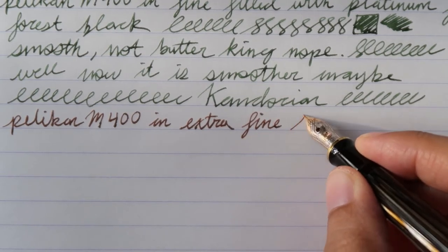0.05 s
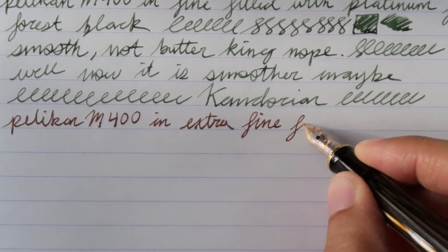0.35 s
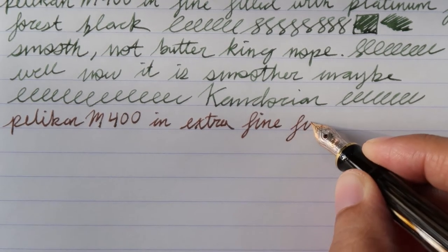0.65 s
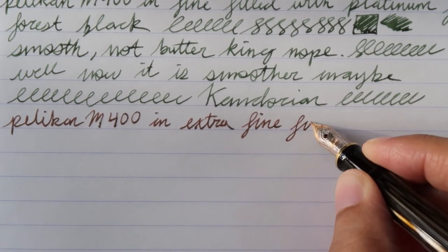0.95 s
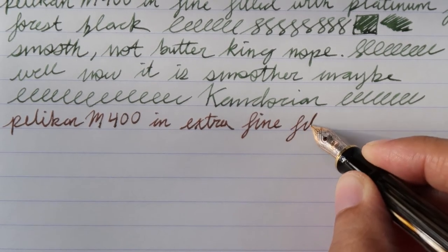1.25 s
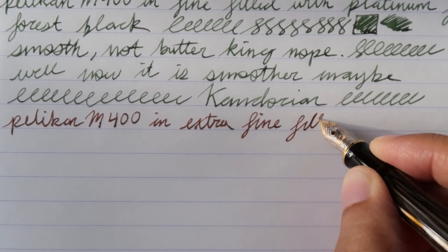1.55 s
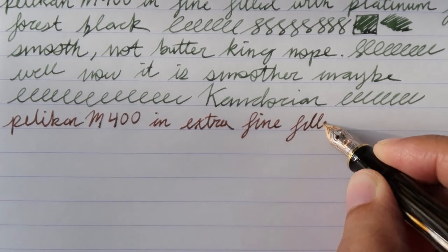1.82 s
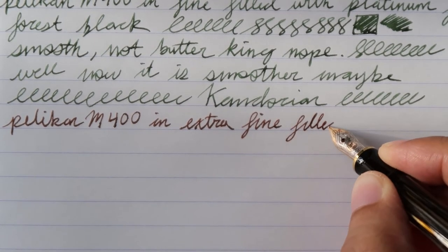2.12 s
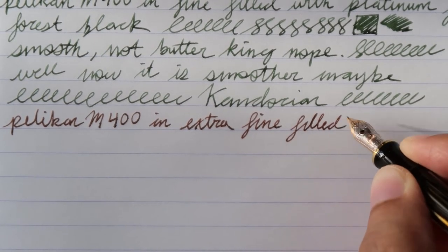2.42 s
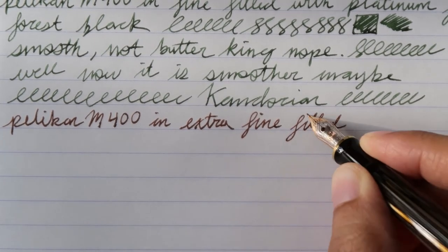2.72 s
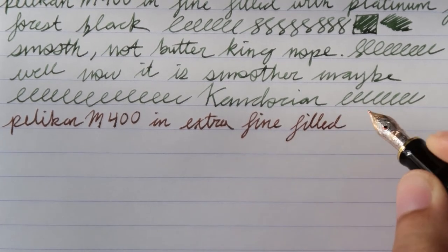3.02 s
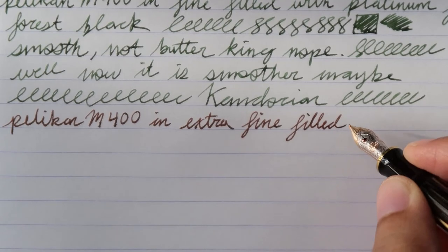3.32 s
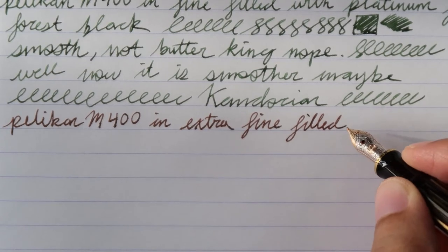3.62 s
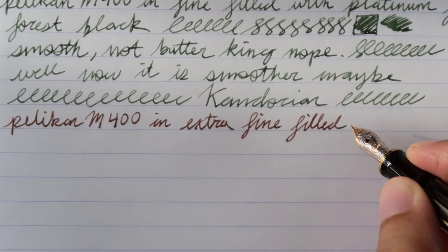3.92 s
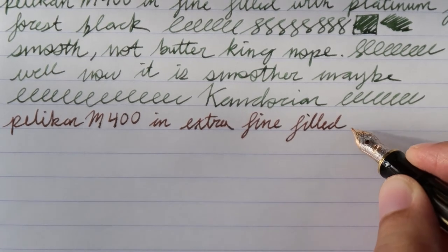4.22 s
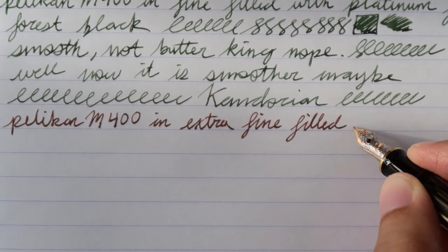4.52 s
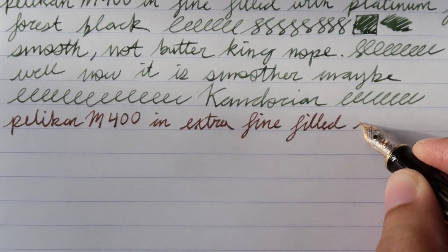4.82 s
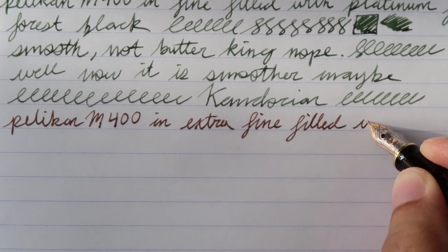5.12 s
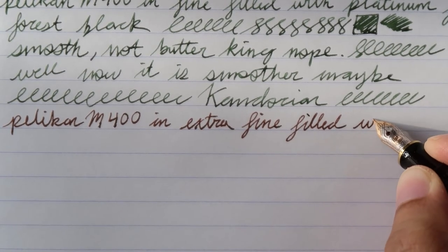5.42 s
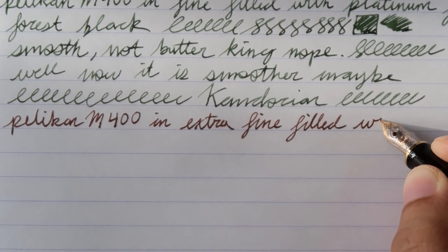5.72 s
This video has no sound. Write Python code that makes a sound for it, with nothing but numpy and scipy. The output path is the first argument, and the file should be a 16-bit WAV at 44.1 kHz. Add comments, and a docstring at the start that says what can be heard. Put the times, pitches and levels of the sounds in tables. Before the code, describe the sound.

A fountain pen scratches lightly on paper in short strokes, pausing briefly as a hand shifts on the sheet, in a quiet room.

```python
"""A fountain pen taps down on a paper pad and starts to write, close to the microphone, in a quiet room.
The nib drags over the fibres: the pen body murmurs near 1 kHz and the tines hiss above it.
Between two words the nib taps a dot, and the hand slides over the sheet and makes it crackle.
Behind the pen, the room hums and rumbles throughout."""
import sys
import numpy as np
from scipy import signal
from scipy.fft import rfft, irfft, next_fast_len
from scipy.io import wavfile
from scipy.ndimage import uniform_filter1d, map_coordinates

SR = 44100
rng = np.random.default_rng(int(sys.argv[2]) if len(sys.argv) > 2 else 0)


def inscribe(sig):
    """Save sig as 16-bit PCM at rate SR to the path in sys.argv[1].

    A 1-D sig is mono; a 2-D sig holds one channel per row.
    Samples are clipped to [-1, 1] before scaling.
    """
    pcm = np.round(np.clip(np.atleast_2d(sig).T, -1, 1) * 32767)
    wavfile.write(sys.argv[1], SR, pcm.astype(np.int16))


N = 258140
TIME = np.arange(N) / SR
# the loudness of each kind of friction goes as speed to these powers
RUB_POWER, GLIDE_POWER, DRAG_POWER, SCRATCH_POWER = 0.74, 0.3, 1.25, 1.57
STROKE_PEAK = 0.48  # the nib is fastest at this share of a stroke


def amp(db):
    return 10 ** (np.asarray(db) / 20)


def unit(x):
    return x / np.sqrt(np.mean(x ** 2) + 1e-30)


def filtered(x, response):
    """x times a response of frequency."""
    size = next_fast_len(N + SR // 2)
    return irfft(rfft(x, size) * response(np.fft.rfftfreq(size, 1 / SR)), size)[:N]


def coloured(x, points):
    """x through a spectrum of (frequency [Hz], gain [dB]) points on a log axis, at unit rms."""
    freqs, db = np.transpose(points)
    return unit(filtered(x, lambda hz: amp(np.interp(np.log(hz + 1), np.log(freqs), db))))


def resonant(x, modes, skirt):
    """x through (frequency [Hz], width [Hz], gain [dB]) modes; a larger skirt darkens the valleys."""
    def response(hz):
        power = 0
        for centre, width, db in modes:
            detuning = (hz ** 2 - centre ** 2) / (hz * width + 1e-9)
            power += amp(db) ** 2 * (1 + detuning ** 2 / skirt) ** -skirt
        return np.sqrt(power)
    return filtered(x, response)


def ringing_noise(modes, skirt):
    """White noise through resonances, at unit rms."""
    return unit(resonant(rng.standard_normal(N), modes, skirt))


def band(hz, width, skirt=1.77):
    """One wavering band of noise."""
    return ringing_noise([(hz, width, 0)], skirt)


def wobble(rate):
    """A smooth random curve, rate knots a second."""
    return map_coordinates(rng.standard_normal(int(N * rate / SR) + 4), [TIME * rate])


def friction(slip_rate, smooth, patchy_db=0, patch_rate=91):
    """Tiny slips, slip_rate a second, over smooth sliding; the paper's grain can come in patches."""
    slips = (rng.random(N) < slip_rate / SR) * rng.standard_normal(N)
    return (unit(slips) + smooth * rng.standard_normal(N)) * amp(patchy_db * wobble(patch_rate))


def drifting(x, patchy_db):
    """The colour drifts in patches as the contact point moves."""
    spectra = signal.stft(x, nperseg=512)[2]
    patches = uniform_filter1d(rng.standard_normal(spectra.shape), size=6, axis=0)
    patches = uniform_filter1d(patches, size=12, axis=1)
    return signal.istft(spectra * amp(patchy_db * unit(patches)), nperseg=512)[1][:N]


def burst(start, db, attack, t60):
    """An envelope that jumps up and dies away."""
    age = np.maximum(TIME - start, 0)
    return amp(db - 60 * age / t60) * (1 - np.exp(-age / attack))


def sweep(start, length, peak, power):
    """The loudness of one movement: it speeds up from rest, peaks at a share of its length and stops."""
    progress = (TIME - start) / length
    moving = (progress > 0) & (progress < 1)
    lean = np.log(0.5) / np.log(peak)
    out = np.zeros(N)
    out[moving] = np.sin(np.pi * progress[moving] ** lean) ** power
    return out


# the hiss of the room behind the pad: (frequency [Hz], gain [dB])
HISS_SPECTRUM = [(140, -20), (240, -3), (350, -2), (450, -8), (800, -12), (950, -17), (1400, -22),
                 (2000, -25), (4000, -28), (7500, -29), (12500, -37), (16000, -39)]
# mains hum in the room: (frequency [Hz], level [dB])
MAINS_HUM = [(120, -69), (240, -86.5)]
# the drone of the room: (frequency [Hz], width [Hz], level [dB])
DRONE_BANDS = [(116.2, 14, -73), (161.3, 13, -71.5), (188, 5.7, -72.5), (246.8, 6.4, -87.5),
               (275.8, 15, -82), (352, 23, -78), (682.5, 20, -85.5)]
def room_tone():
    """The steady background at the microphone: hiss, mains hum and a drone of narrow, wavering bands."""
    hiss = amp(-74) * coloured(rng.standard_normal(N), HISS_SPECTRUM)
    hum = sum(amp(db) * unit(np.sin(2 * np.pi * hz * TIME + 0.25 * wobble(3))) for hz, db in MAINS_HUM)
    drone = sum(amp(db) * band(hz, width) for hz, width, db in DRONE_BANDS)
    return hiss + hum + drone


# the low end of the room: (frequency [Hz], gain [dB])
RUMBLE_SPECTRUM = [(1, 6.5), (5, 9), (10, 4), (15, 5), (20, -9.5), (37, -5), (48, -16), (58, -16),
                   (76, -26.5), (140, -27), (230, -37.5), (300, -68.5)]
# swells of the rumble: (time [s], length [s], level [dB])
RUMBLE_SWELLS = [(1.422, 0.13, -52), (1.572, 0.22, -49)]
# the fade of the room's boom: (time [s], relative level [dB])
BOOM_FADE = [(0.0, -57.5), (0.5, -57), (1.4, -67), (5.85, -67.5)]
def room_rumble():
    """A deep rumble swells twice; a low boom above it fades early on."""
    rumble = amp(-46.5) * coloured(rng.standard_normal(N), RUMBLE_SPECTRUM)
    swells = sum(amp(db) * sweep(start, length, 0.51, 0.83) for start, length, db in RUMBLE_SWELLS)
    boom = amp(np.interp(TIME, *np.transpose(BOOM_FADE)) - 6.5)
    return rumble + swells * band(hz=28.8, width=11.4) + boom * band(hz=171, width=25)


# skin on paper, heard close: (frequency [Hz], gain [dB])
SKIN_SPECTRUM = [(120, -32), (240, -8), (420, -4), (630, -1.5), (1200, -4), (2700, -12), (5500, -16.5),
                 (12000, -21), (16000, -27)]
# four pushes across the sheet: (time [s], length [s], peak [share of length], relative level [dB])
HAND_SLIDES = [(2.787, 0.44, 0.38, -78.5), (3.337, 0.32, 0.5, -75), (3.536, 0.33, 0.5, -79.5),
               (3.737, 0.34, 0.46, -76)]
def hand_rub():
    """Between the words the side of the hand slides over the sheet, then rests and stirs faintly."""
    rub = coloured(friction(slip_rate=1800, smooth=1.4, patchy_db=1.6, patch_rate=54), SKIN_SPECTRUM)
    resting = amp(-81.5) * sweep(start=3.217, length=1.54, peak=0.26, power=RUB_POWER)
    power = resting ** 2
    for start, length, peak, db in HAND_SLIDES:
        power += (amp(db) * sweep(start, length, peak, RUB_POWER)) ** 2
    return amp(3.5) * np.sqrt(power) * rub


# shifts of the pad: (time [s], length [s], level [dB], pitch [Hz])
PAD_SHUFFLES = [(2.884, 0.17, -67, 246), (2.89, 0.2, -78.5, 775), (3.05, 0.037, -70, 597),
                (3.6, 0.2, -77, 447), (3.8, 0.045, -69.5, 730), (3.817, 0.22, -71, 420),
                (3.915, 0.071, -71, 647)]
def pad_shuffles():
    """The pad shifts under the hand with a dull shuffle."""
    return sum(amp(db) * sweep(start, length, 0.37, RUB_POWER) * band(hz, width=0.3 * hz, skirt=0.93)
               for start, length, db, hz in PAD_SHUFFLES)


# the sheet gives under the hand: (time [s], relative pop level [dB], pitch [Hz], crackle level [dB])
SHEET_CREASES = [(2.88, -61, 1500, -63), (3.053, -72, 900, -63), (3.139, -60, 1590, -67),
                 (3.680, -55, 1010, -57), (3.711, -63, 860, -52.5), (3.751, -70, 2180, -65),
                 (3.8111, -45.5, 1230, -56), (3.979, -62, 2370, -57)]
# crackling paper, heard close: (frequency [Hz], gain [dB])
CRACKLE_SPECTRUM = [(150, -1), (400, 13), (1300, -3), (2200, -7), (5000, -11.5), (7000, -15), (15000, -26)]
def creases():
    """The sheet buckles with a dull pop of a few cycles and a brief crackle."""
    crackle = coloured(rng.standard_normal(N), CRACKLE_SPECTRUM)
    out = np.zeros(N)
    for start, pop_db, hz, crackle_db in SHEET_CREASES:
        tone = np.sin(2 * np.pi * hz * (TIME - start))
        out += burst(start, pop_db + 1, attack=0.00026, t60=0.0049) * tone
        out += burst(start, crackle_db, attack=0.00091, t60=0.024) * crackle
    return out


# fibres that catch the nib: (time [s], relative level [dB], pitch [Hz])
FIBRE_SNAGS = [(0.775, -70, 7500), (3.201, -65, 7900), (3.998, -63, 6700), (5.184, -66.5, 4540),
               (5.387, -60, 2720)]
def snags():
    """A fibre lets go of the nib with one short, pitched tick."""
    return sum(burst(start, db - 10.5, attack=0.00055, t60=0.044) * band(hz, width=0.2 * hz, skirt=1.4)
               for start, db, hz in FIBRE_SNAGS)


# the nib barely touching the page: (frequency [Hz], gain [dB])
FLICK_SPECTRUM = [(1000, 7.5), (2500, 1), (5500, 0), (11500, 1.5), (13500, -8), (16000, -22)]
def flick():
    """One light, airy upstroke: with almost no pressure the nib only whispers."""
    level = amp(-75) * sweep(start=2.522, length=0.09, peak=STROKE_PEAK, power=SCRATCH_POWER)
    return level * coloured(rng.standard_normal(N), FLICK_SPECTRUM)


# the thud of the pad: (frequency [Hz], width [Hz], gain [dB])
THUD_MODES = [(376, 140, -2), (500, 79, 5)]
def dig():
    """On its hardest stroke the nib digs in and gives the pad a soft, low knock."""
    level = amp(-66.5) * sweep(start=2.364, length=0.06, peak=0.45, power=DRAG_POWER)
    return level * ringing_noise(THUD_MODES, skirt=1.2)


# the nib lands, close to the microphone: (time [s], relative knock level [dB], skid level [dB])
NIB_TAPS = [(0.053, -64, -83), (2.7525, -60.5, -69), (2.757, -70, -63.5), (2.763, -59, -69),
            (2.802, -59, -72), (2.806, -67, -71), (5.212, -59, -76)]
# what a landing rings in the pen: (frequency [Hz], gain [dB], t60 [s])
KNOCK_MODES = [(1023, -0.5, 0.06), (1123, -1.5, 0.025), (1380, 0.5, 0.017), (1760, -9, 0.018),
               (2140, -22, .03), (2650, -9, 0.017), (4230, -13, 0.03)]
def taps():
    """The landing nib knocks the pen body and skids for a moment."""
    skid = ringing_noise([(1160, 400, 7), (2560, 620, 0), (3900, 500, -9)], skirt=2.1)
    out = skid * sum(burst(start, db, attack=0.002, t60=0.06) for start, _, db in NIB_TAPS)
    age = np.arange(SR // 10) / SR
    onset = 1 - np.exp(-age / 0.0008)
    for start, knock_db, _ in NIB_TAPS:
        ring = 0
        for hz, db, t60 in KNOCK_MODES:
            decay = amp(db + rng.normal(0, 1.2) - 60 * age / t60)
            ring += decay * np.sin(2 * np.pi * (hz * age + rng.random()))
        out[round(start * SR):][:len(age)] += amp(knock_db - 4) * ring * onset
    return out


# resonances of the tines, heard close: (frequency [Hz], width [Hz], gain [dB])
TINE_MODES = [(2490, 1150, -1), (2980, 360, -0.5), (3730, 420, -2), (4175, 340, 1.3), (5000, 480, -4),
              (5370, 400, 2.5), (6810, 700, -6.5), (8230, 800, -3.5), (9160, 490, -4.2),
              (11100, 2600, -16.5), (14700, 1000, -17)]
# soft modes of the pad under the nib: (frequency [Hz], width [Hz], gain [dB])
PAD_MODES = [(263, 34, -14), (404, 150, 1.5), (470, 130, -2)]
TREBLE_HZ = 5830  # above this the hiss follows the treble level
def scratch(level, treble_level):
    """The edges of the tines catch many fine fibres and hiss; the pad thrums under them."""
    ring = resonant(friction(slip_rate=7000, smooth=1.6), TINE_MODES, skirt=1.7)
    clock = np.arange(N) + np.cumsum(0.013 * wobble(rate=14))  # the resonances shift as the nib turns
    wandering = map_coordinates(ring, [clock], mode="mirror")
    hiss = unit(drifting(wandering, patchy_db=2.3))
    treble = filtered(hiss, lambda hz: 1 - 1 / (1 + (hz / TREBLE_HZ) ** 6))
    thrum = amp(1.5) * ringing_noise(PAD_MODES, skirt=1.7)
    return level * (hiss - treble + thrum) + treble_level * treble


# resonances of the pen on the pad, heard close: (frequency [Hz], width [Hz], gain [dB])
PEN_MODES = [(480, 260, -8), (979, 57, 1), (1037, 63, -4), (1106.7, 16, 6.5), (1177, 33, 1), (1287, 34, 2),
             (1407, 137, 2), (1620, 170, -7.5), (1686, 55, -10.5), (1730, 130, -5.5)]
def drag(level, favoured_hz):
    """Rough spurts of drag ring the pen; the stroke's direction favours the modes near one pitch."""
    slips = friction(slip_rate=1800, smooth=1.3, patchy_db=0.5, patch_rate=68)
    ring, power = np.zeros(N), np.zeros(N)
    for hz, width, db in PEN_MODES:
        weight = 0.22 + 1 / (1 + ((hz - favoured_hz) / 115) ** 2)
        mode = resonant(slips, [(hz, width, db)], skirt=1.53)
        ring += weight * mode
        power += weight ** 2 * np.mean(mode ** 2)
    return level * unit(ring / np.sqrt(power))


# the nib stays on the page through joined letters: (time [s], length [s], level [dB])
NIB_GLIDES = [(0.053, 0.74, -82), (1.144, 1.6, -83.5), (4.83, 0.63, -83.5)]
# strokes of the nib, close to the microphone:
# (time [s], length [s], drag level [dB], scratch level [dB], favoured pitch [Hz], extra treble [dB])
NIB_STROKES = [(0.046, 0.11, -71.5, -73.5, 1170, 0.5), (0.117, 0.098, -68.5, -85, 1120, -1),
               (0.167, 0.16, -76, -74.5, 1120, 2), (0.209, 0.086, -63.5, -78, 1120, -3),
               (0.265, 0.088, -71, -74, 1160, 1), (0.312, 0.062, -67.5, -84, 1150, -2),
               (0.347, 0.16, -72, -72, 1030, -1), (0.529, 0.089, -76.5, -79, 1120, 0),
               (0.569, 0.066, -72.5, -92, 1130, -2), (0.632, 0.11, -76.5, -83, 1120, -1),
               (1.157, 0.093, -73, -83.5, 1050, 2), (1.277, 0.089, -75, -79, 1070, 2.5),
               (1.329, 0.072, -68.5, -82, 1270, -4), (1.376, 0.064, -78, -89, 1090, -3),
               (1.436, 0.21, -78.5, -89, 1000, 2), (1.6, 0.09, -75, -79, 1170, 0),
               (1.637, 0.11, -65.5, -81.5, 1160, -6), (1.725, 0.11, -73.5, -80, 1050, -5),
               (1.82, 0.053, -76, -93, 1030, -5), (1.895, 0.047, -75, -85.0, 1210, 3),
               (1.927, 0.037, -71, -88, 1200, 4), (1.948, 0.074, -70, -86, 1250, -3),
               (2.036, 0.14, -78, -84.5, 1110, 3), (2.162, 0.066, -72, -77.5, 1210, -4),
               (2.183, 0.11, -71, -87, 1170, -2), (2.234, 0.14, -70.5, -79.5, 1090, 3),
               (2.355, 0.052, -65, -69.5, 1110, -2.5), (2.381, 0.077, -61.5, -75, 1270, -5),
               (2.413, 0.069, -69, -73, 1140, -0.5), (4.838, 0.063, -72, -87, 1060, -3),
               (4.859, 0.099, -75.5, -80, 1140, 4), (4.986, 0.11, -66.5, -81.5, 1160, 0.5),
               (5.076, 0.11, -76, -84, 1040, 1), (5.207, 0.1, -69, -85, 1160, -11),
               (5.28, 0.18, -75, -87.5, 1020, 1), (5.586, 0.13, -72, -85, 1080, -9),
               (5.8, 0.088, -68, -79, 1150, -1)]
GLIDE_HZ, CLIMB_HZ = 1075, 80  # a glide's favoured pitch; a stroke's climb from rest to full speed
def writing():
    """The moving nib drives the drag and the scratch; overlapping strokes add in power."""
    drag_power, scratch_power, treble_power = np.full(N, 1e-20), np.zeros(N), np.zeros(N)
    for start, length, db in NIB_GLIDES:
        drag_power += (amp(db) * sweep(start, length, STROKE_PEAK, GLIDE_POWER)) ** 2
    weighted_hz = drag_power * GLIDE_HZ
    for start, length, drag_db, scratch_db, hz, treble_db in NIB_STROKES:
        motion = sweep(start, length, STROKE_PEAK, DRAG_POWER)
        power = (amp(drag_db) * motion) ** 2
        drag_power += power
        weighted_hz += power * (hz + CLIMB_HZ * (motion - 1))
        bite = amp(scratch_db) * sweep(start, length, STROKE_PEAK, SCRATCH_POWER)
        scratch_power += bite ** 2
        treble_power += (amp(treble_db) * bite) ** 2
    murmur = drag(np.sqrt(drag_power), favoured_hz=weighted_hz / drag_power)
    return murmur + scratch(np.sqrt(scratch_power), np.sqrt(treble_power))


def scene():
    """One microphone close to the pad: nib and paper in front, the room behind them."""
    nib = writing() + dig() + flick() + taps() + snags()
    paper = hand_rub() + pad_shuffles() + creases()
    return (nib + paper + room_tone() + room_rumble())[None]


def record(dry):
    """The recorder keeps nothing above its band limit."""
    return filtered(dry[0], lambda hz: hz < 15700)[None]


dry = scene()
out = record(dry)
inscribe(out)
```